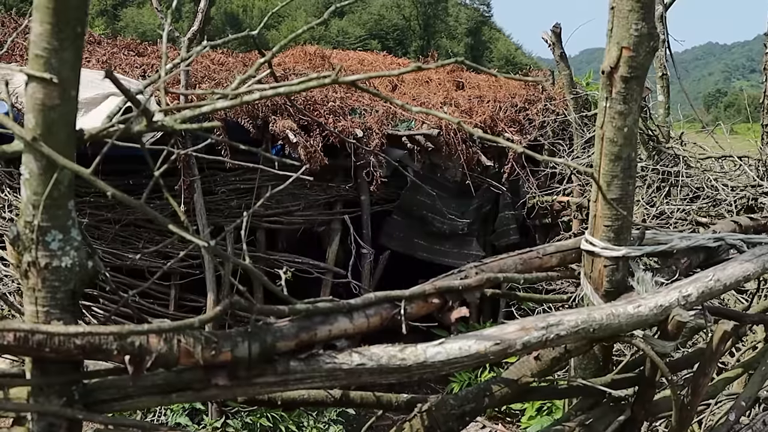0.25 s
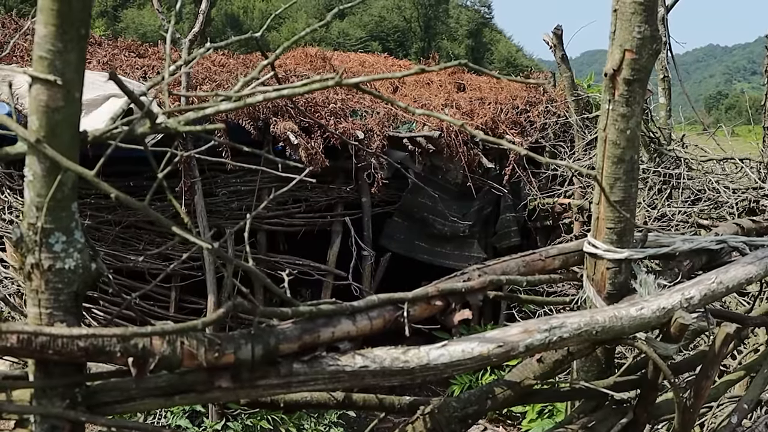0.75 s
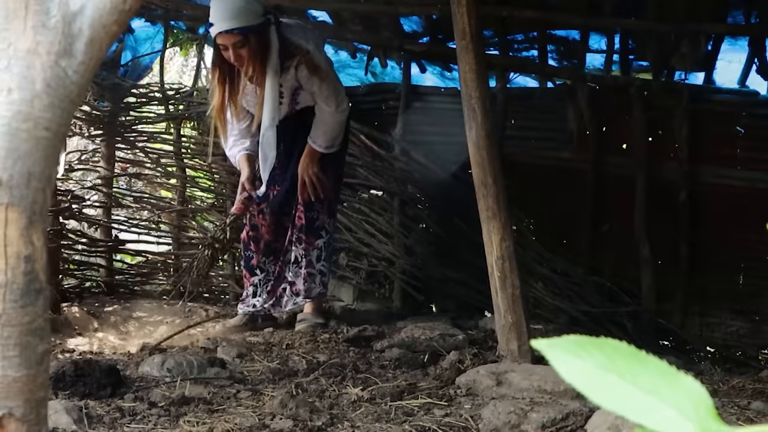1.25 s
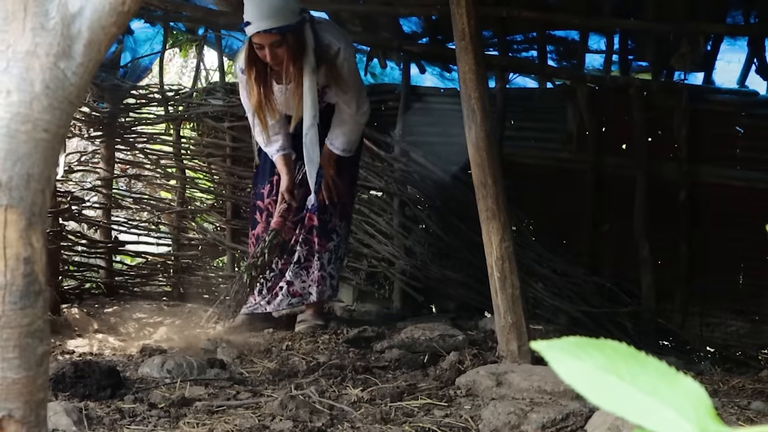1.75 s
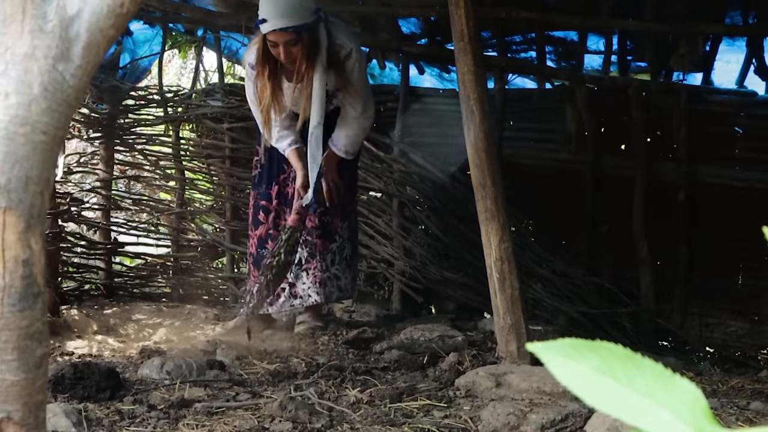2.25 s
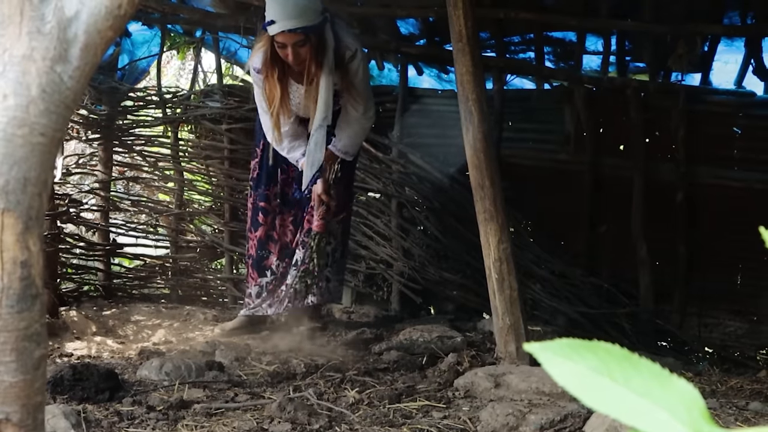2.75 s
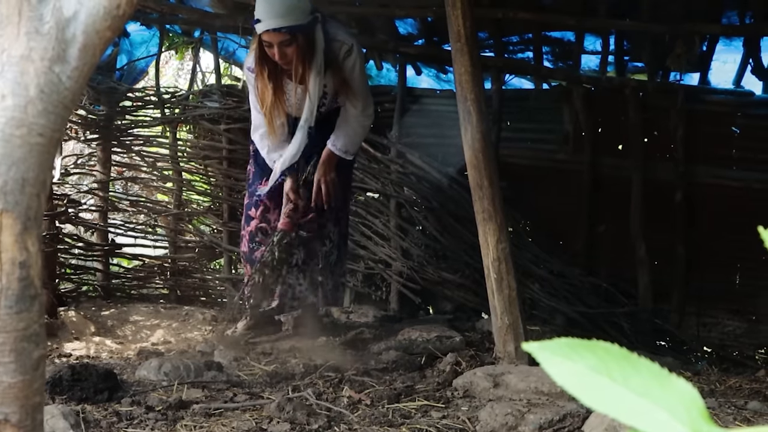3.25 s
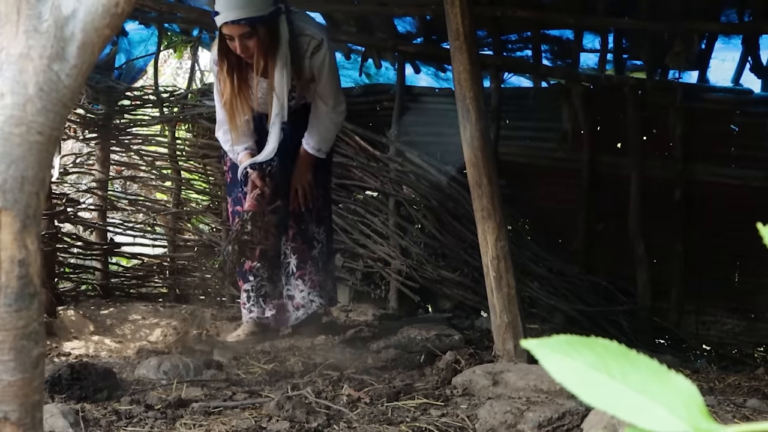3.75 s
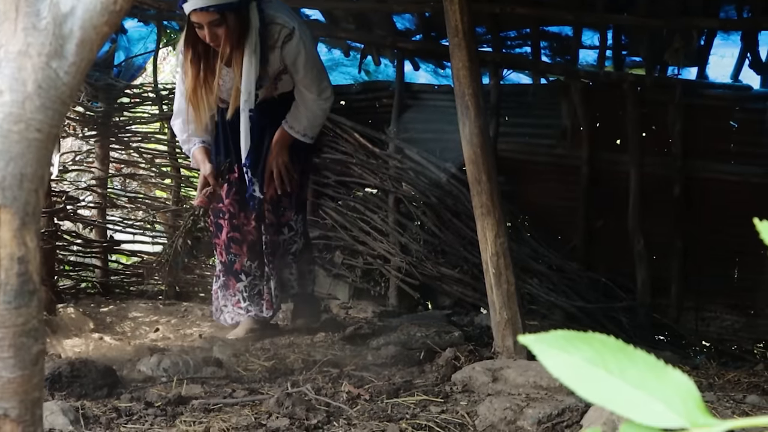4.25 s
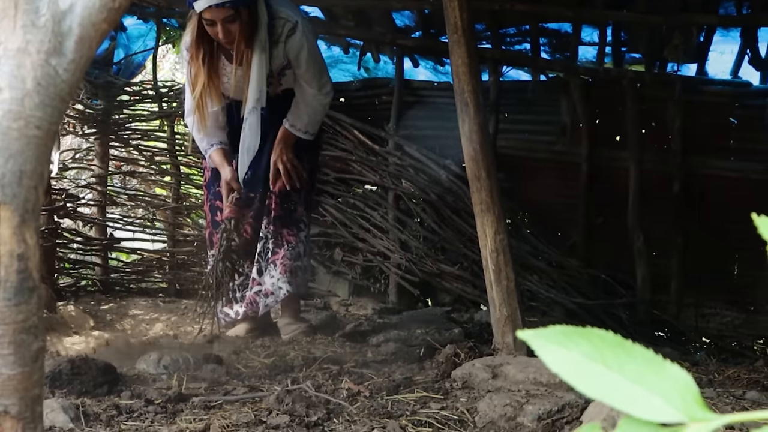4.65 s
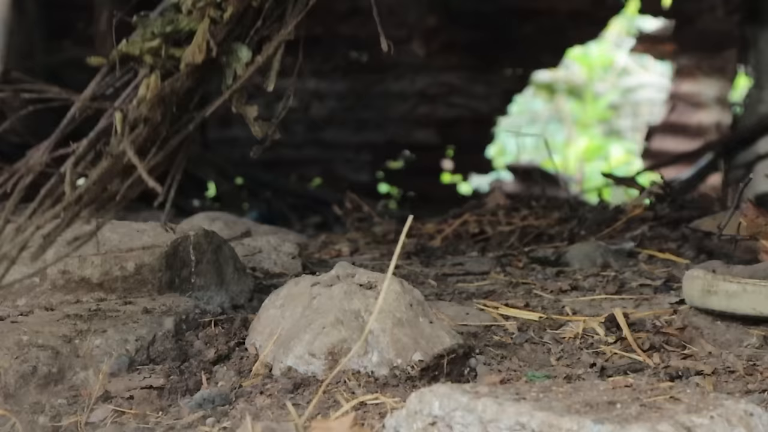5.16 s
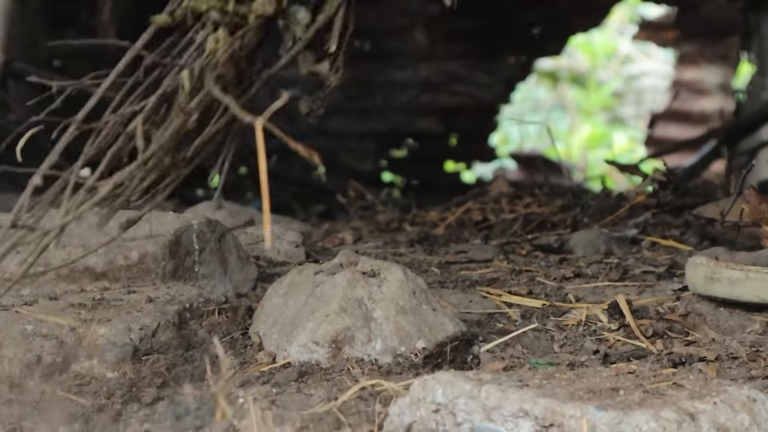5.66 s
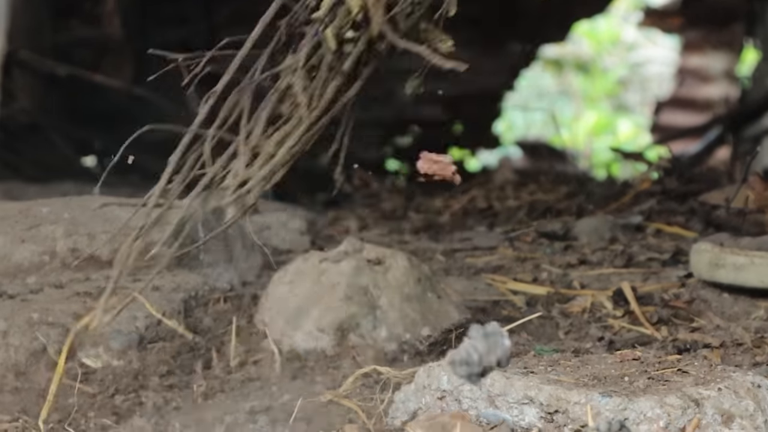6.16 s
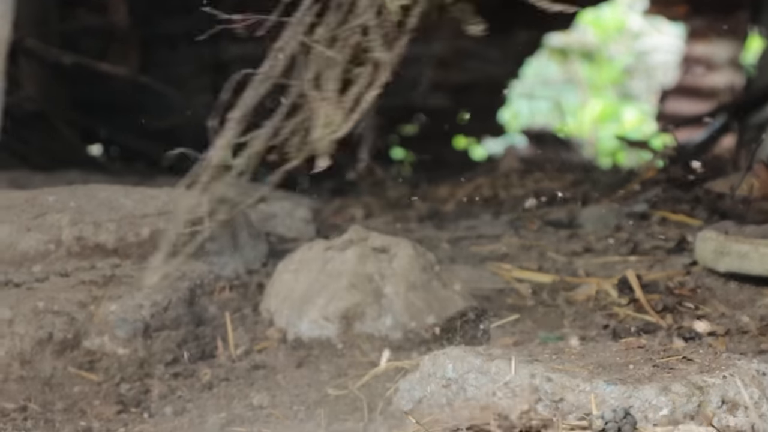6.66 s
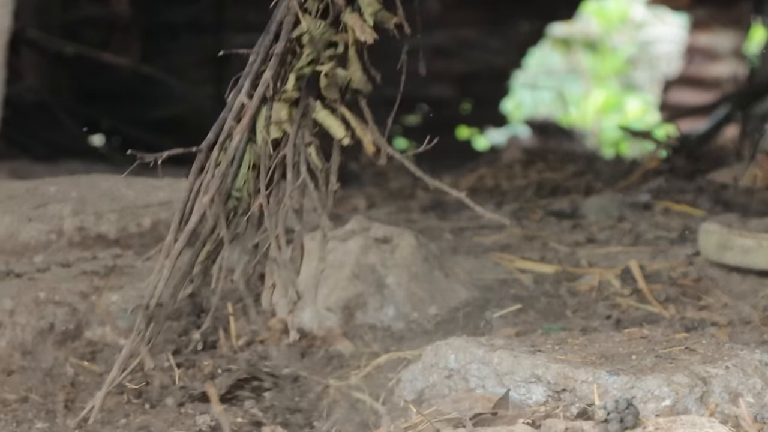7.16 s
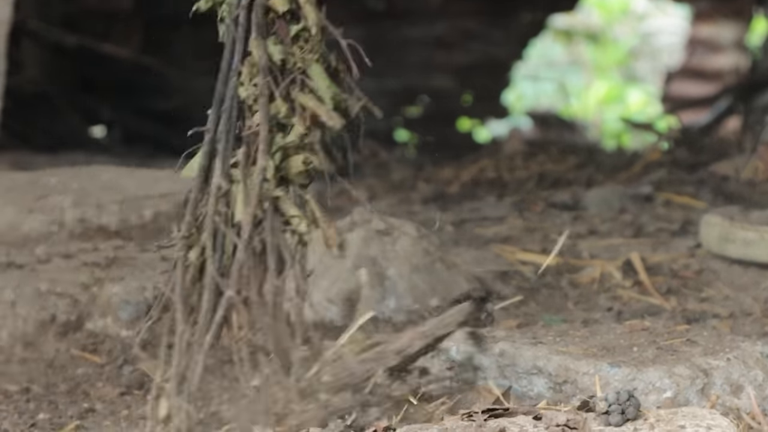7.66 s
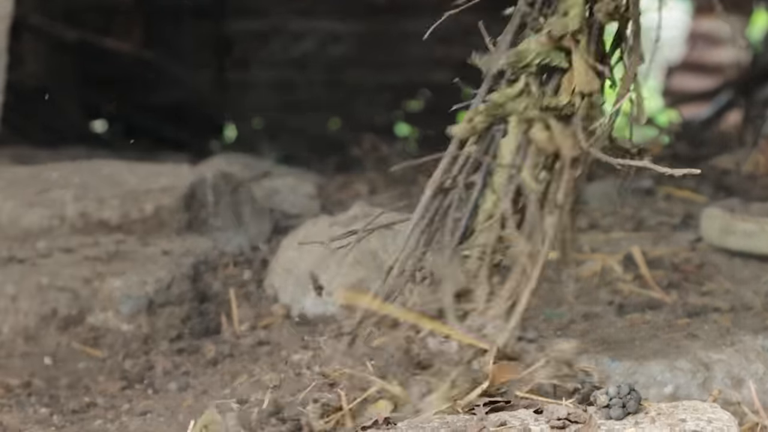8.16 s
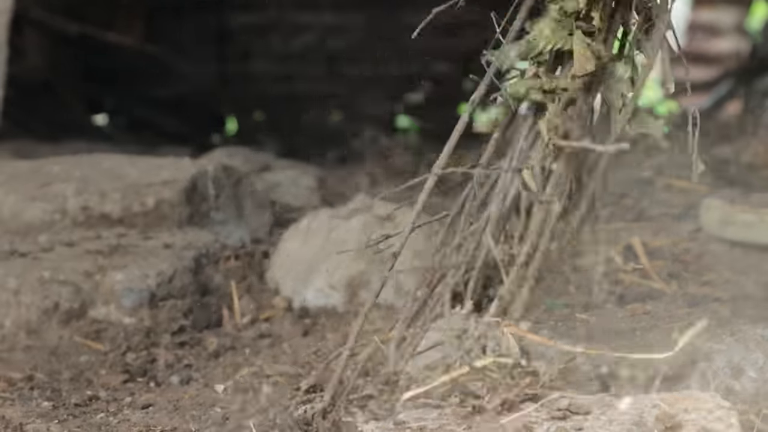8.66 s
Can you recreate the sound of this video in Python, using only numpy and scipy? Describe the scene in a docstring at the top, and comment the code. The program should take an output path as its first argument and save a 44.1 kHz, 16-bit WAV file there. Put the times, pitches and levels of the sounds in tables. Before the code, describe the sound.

Faint distant engine throb and a quick bird twitter, then a dry twig broom sweeps dirt in brisk, scratchy, hissing strokes with small snaps.

```python
"""Twig broom in an open hut

A bundle of dry twigs sweeps a dirt floor in quick strokes: noise shaped by random slips and hand pressure.
Twigs snap (noise bursts), clods thud (damped tones), and birds chirp and hoot outside (bent sine notes).
Far away a slow engine throbs (harmonics) in open air (noise); late on something rumbles low.
The camera turns down every quiet band above about 750 Hz."""
import sys
import numpy as np
from scipy import signal
from scipy.fft import rfft, irfft, next_fast_len
from scipy.io import wavfile
from scipy.ndimage import uniform_filter1d, map_coordinates

SR = 44100
rng = np.random.default_rng(int(sys.argv[2]) if len(sys.argv) > 2 else 0)


def int16_out(signal):
    """Quantize to a 16-bit WAV file."""
    q = np.round(np.clip(np.atleast_2d(signal).T, -1, 1) * 32767)
    wavfile.write(sys.argv[1], SR, q.astype(np.int16))


N = 393362  # length [samples]

# broom strokes: (touch time [s], rise [s], hold [s], lift [s], touch level under full pressure [dB],
# twig-tip hiss [dB], scratch on the dirt [dB], stem drag [dB])
BROOM_STROKES = [(0.96, 0.11, 0.16, 0.095, 18, -39, -43, -54),
                 (1.447, 0.18, 0.0083, 0.19, 11.5, -36.5, -43.5, -56.5),
                 (1.868, 0.18, 0.0077, 0.27, 22, -33.5, -40, -63),
                 (2.384, 0.15, 0.074, 0.053, 13, -34, -42, -54.5),
                 (2.796, 0.11, 0.083, 0.17, 9, -40, -50.5, -58),
                 (3.248, 0.16, 0.0077, 0.063, 16, -35, -50.5, -58),
                 (3.695, 0.048, 0.1, 0.041, 11.5, -36.5, -51, -58),
                 (4.108, 0.057, 0.086, 0.11, 20.5, -32.5, -45.5, -53),
                 (4.522, 0.14, 0.076, 0.11, 16.5, -32, -42.5, -50),
                 (5.003, 0.093, 0.013, 0.11, 20, -32, -43, -51.5),
                 (5.291, 0.12, 0.16, 0.069, 11, -36, -44, -56.5),
                 (5.847, 0.13, 0.063, 0.15, 17, -31.5, -37.5, -49.5),
                 (6.381, 0.12, 0.056, 0.14, 22.5, -31.5, -36.5, -53.5),
                 (7.007, 0.09, 0.036, 0.18, 20, -33, -36.5, -50.5),
                 (7.526, 0.19, 0.061, 0.14, 6.5, -41, -49, -49.5),
                 (8.003, 0.14, 0.2, 0.063, 26.5, -35, -39.5, -72),
                 (8.533, 0.13, 0.055, 0.13, 11, -35.5, -40.5, -53)]
# short scuffs of loose debris during and between strokes:
# (time [s], length [s], twig-tip hiss [dB], scratch [dB], grit [dB], stem drag [dB])
DEBRIS_SCUFFS = [(0.425, 0.061, -73.5, -57.5, -68, -56), (1.314, 0.081, -46.5, -58.5, -60, -60),
                 (1.498, 0.11, -68, -47.5, -66, -49), (1.719, 0.055, -55, -53, -76.5, -66),
                 (1.853, 0.048, -39.5, -48.5, -55.5, -59.5), (2.364, 0.015, -45, -46, -58, -57),
                 (2.651, 0.16, -48, -57, -53, -66), (2.732, 0.055, -54, -47, -57, -55),
                 (3.279, 0.18, -63, -58, -66.5, -55), (3.57, 0.15, -66.5, -58.5, -76, -51),
                 (3.866, 0.018, -29, -28.5, -32.5, -35.5), (3.94, 0.06, -46, -50, -63, -58),
                 (4.021, 0.044, -49.5, -49, -67, -58), (4.085, 0.067, -47.5, -46.5, -80, -57),
                 (4.802, 0.041, -73, -56, -77, -52), (4.956, 0.061, -45.5, -51, -63.5, -50),
                 (6.1, 0.21, -72.5, -60, -82, -49.5), (6.344, 0.079, -60, -55, -60, -64.5),
                 (6.662, 0.42, -54.5, -60.5, -56, -56), (6.959, 0.15, -45, -60.5, -51.5, -62),
                 (7.82, 0.11, -68, -62, -70, -58), (7.889, 0.15, -70, -56, -53, -48),
                 (8.396, 0.55, -57, -53.5, -51, -58)]
# leaves rustling between strokes: (time [s], level [dB])
LEAF_RUSTLE = [(.93, -56.5), (3.1, -52.5), (5.2, -54), (6.3, -58.5), (7.4, -67.5), (8.92, -51.5)]
# grit against the scratch, weaker at first and stronger later: (time [s], grit level [dB])
GRIT_OVER_TIME = [(1, -11), (2.5, -3), (5, 3.5), (5.9, 6.5), (8.9, 3)]
# colours of tip hiss, dirt scratch, grit and stem drag: (frequency [Hz], relative level [dB per Hz])
TIP_SPECTRUM = [(4000, -25), (6300, -13.5), (8000, 1.5), (10500, 4), (12000, 0), (13500, -16.5),
                (16000, -38.5)]
DIRT_SPECTRUM = [(900, -26), (1400, -8.5), (2200, 3.5), (3200, 2), (4200, -4), (6000, -46.5)]
GRIT_SPECTRUM = [(2500, -20), (3600, -3.5), (4800, 0.5), (6000, -8.5), (8000, -9.5), (12000, -57)]
STEM_SPECTRUM = [(120, -26.5), (300, -1.5), (800, -1), (1300, 1), (2000, -19)]
# twig snaps and ticks: (time [s], relative level [dB], part under 6 kHz against the whole [dB],
# left-right difference [dB])
TWIG_SNAPS = [(0.2556, -40, -16, -2), (0.3289, -47.5, -30, 13), (1.182, -35, -2, 2),
              (1.8591, -33.5, -12, 6), (2.5122, -28.5, 7, -14), (2.687, -37.5, -4.5, 6),
              (2.729, -34, -2, 3), (3.7187, -38, -37.5, -2.5), (3.8455, -16, -8, -11),
              (4.364, -37.5, -64, 1), (4.407, -46.5, -51, 21.5), (4.439, -41, -56, 6),
              (4.5696, -13, -19, -11), (5.0664, -20, -16, 4), (5.299, -32.5, -7, 10), (6.134, -42, 0, 1.5),
              (6.4376, -30, -25.5, -5.5), (7.0849, -25.5, -2.5, 8.5), (7.153, -28.5, -0.5, 1),
              (7.9145, -40, 0, 3.5), (8.056, -32.5, -9, 3), (8.4125, -25, 0, -4.5), (8.5776, -26, 9, 10),
              (8.657, -21.5, -5.5, -5)]
# colour of a breaking twig: (frequency [Hz], relative level [dB per Hz])
CRACK_SPECTRUM = [(4500, -33), (8000, -8.5), (11000, -4.5), (14000, -31.5)]
# clods and steps: (time [s], relative level [dB], pitch [Hz], 60 dB decay [s])
CLOD_THUDS = [(0.441, -38, 267, 0.028), (2.801, -37, 570, 0.062), (4.573, -30.5, 460, 0.018),
              (5.295, -32, 270, 0.057), (5.822, -27.5, 746, 0.043), (6.697, -37, 706, 0.069),
              (7.414, -38.5, 206, 0.33), (7.562, -37.5, 726, 0.095), (7.678, -32.5, 126.2, 0.3),
              (8.299, -34.5, 670, 0.063), (8.547, -28.5, 245, 0.028)]
# bird notes, then soft low hoots:
# (time [s], length [s], start pitch [Hz], middle pitch [Hz], end pitch [Hz], level [dB])
BIRD_NOTES = [(.231, 0.012, 3700, 4000, 4400, -58), (.247, 0.011, 3620, 4300, 4900, -53),
              (.263, 0.008, 4800, 4350, 3750, -49), (.275, 0.013, 4800, 4060, 3340, -49.5),
              (.292, 0.012, 3270, 4360, 3400, -44), (.309, 0.022, 3320, 3950, 4400, -45.5),
              (.331, 0.013, 4440, 3970, 3100, -47.5), (.356, 0.012, 3130, 3450, 3100, -51.5),
              (1.31, .092, 2850, 2500, 2420, -60), (1.732, 0.042, 3880, 3680, 3120, -48),
              (1.875, 0.064, 3520, 3430, 3520, -50), (1.938, 0.078, 3580, 3070, 3560, -49),
              (2.085, 0.069, 3950, 3490, 3150, -55.5), (3.222, 0.016, 4000, 3900, 3780, -58),
              (3.243, 0.04, 3580, 3420, 3200, -56)]
LOW_HOOTS = [(5.61, 0.067, 742, 715, 663, -49), (6.94, 0.065, 747, 713, 670, -47),
             (8.14, 0.38, 288.6, 293.7, 247, -54)]
# engine orders: (multiple of the firing rate, relative level [dB])
ENGINE_ORDERS = [(2, -4), (3, -4), (4, -3), (5, -10), (6, -13.5)]
# background over time: (time [s], waver of the engine's orders [dB], air gain [dB], low rumble level [dB])
BACKGROUND = [(.85, 5, 3.5, -70), (1, 1, 1.5, -70), (5.2, 1, 3, -68), (7.0, 2, 0.5, -62),
              (7.9, 1.5, 4.5, -58), (8.92, 2.5, 4.5, -57)]
# colour of the open air: (frequency [Hz], level before the gain over time [dB per Hz])
AIR_SPECTRUM = [(25, -110), (50, -93), (120, -87), (200, -83), (350, -90), (520, -84), (730, -92.5),
                (1000, -92), (2000, -105), (3200, -100), (4900, -99.5), (6300, -100), (9000, -106),
                (12000, -112), (16000, -125)]
# colour of the late rumble: (frequency [Hz], relative level [dB per Hz])
RUMBLE_SPECTRUM = [(70, -40.5), (110, -7.5), (200, -2.5), (300, -2.5), (400, -34)]
# stereo width of the noises: (frequency [Hz], left-right likeness [0-1])
STEREO_LIKENESS = [(60, 0.71), (240, 0.79), (950, 0.11), (3770, 0.024), (15000, 0.038)]
# unlike colour of the two microphone ports: (frequency [Hz], left-right difference [dB])
PORT_COLOUR = [(60, -2), (180, -1), (550, -7.5), (1650, -5), (4970, 1.5), (15000, 6.5)]
# where the noise suppressor opens: (frequency [Hz], level over the band's quiet level [dB])
OPENING_LEVELS = [(750, 17.5), (2000, 14), (5000, 13.5), (8000, 18.5), (12000, 17)]

TOUCH_S, SAG_DB, LIFT_DB = 0.0087, 3.5, 24.5  # landing time; loss by the end of the hold; loss per lift time
DIRT_STEEPER, STEMS_FLATTER = 1.294, 0.66  # how scratch and drag follow the pressure in dB
SCUFF_FADE_DB = 9  # lost over a scuff's length
FIRING_HZ, ENGINE_DB = 23.63, -52.5
TOP_HZ = 15830  # upper band limit


def broom():
    """Tips hiss, twigs scratch dirt and grit, stems drag; thick twigs' slips drive all but the tips."""
    tips_gain, dirt_gain, grit_gain, stems_gain = gestures()
    thin = slips(rate=230, spiky_db=4.0, life_s=0.0052)
    thick = slips(rate=330, spiky_db=0, life_s=0.0022)
    tips = tips_gain * scratchy(TIP_SPECTRUM, thin, patchy_db=0.5)
    dirt = dirt_gain * scratchy(DIRT_SPECTRUM, thick, patchy_db=4)
    grit = grit_gain * scratchy(GRIT_SPECTRUM, thick, patchy_db=4)
    softened = np.sqrt(thick)
    stems = stems_gain * scratchy(STEM_SPECTRUM, softened, patchy_db=2)
    return tips + dirt + grit + stems


def gestures():
    """Gain over time of tips, dirt, grit and stems: the powers of strokes, scuffs and rustle add up."""
    power, t = np.zeros((4, N)), np.arange(N) / SR
    follows = np.array([[1], [DIRT_STEEPER], [DIRT_STEEPER], [STEMS_FLATTER]])
    for s, rise, hold, lift, touch_db, tips_db, dirt_db, drag_db in BROOM_STROKES:
        grit_db = dirt_db + np.interp(s, *np.transpose(GRIT_OVER_TIME))
        end = s + rise + hold + 4 * lift
        span = slice(round((s - TOUCH_S) * SR), round(end * SR))
        top_db = np.c_[[tips_db, dirt_db, grit_db, drag_db]]
        push_db = pressure(s, rise, hold, lift, touch_db)[span]
        power[:, span] += amp(top_db + follows * push_db) ** 2
    for s, length, *levels_db in DEBRIS_SCUFFS:
        span = slice(round(s * SR), round((s + 4 * length) * SR))
        fade_db = SCUFF_FADE_DB * abs(t[span] - s) / length
        power[:, span] += amp(np.c_[levels_db] - fade_db) ** 2
    # the leaves rustle in the tips' band
    rustle_db, = curves(LEAF_RUSTLE)
    power[0] += amp(rustle_db) ** 2 * (t > LEAF_RUSTLE[0][0])
    return np.sqrt(power)


def pressure(s, rise, hold, lift, touch_db):
    """Pressure in dB against full: the twigs land, dig in, sag a little and lift off."""
    times = s + np.cumsum([-TOUCH_S, TOUCH_S, rise, hold, 4 * lift])
    levels_db = [-4 * LIFT_DB, -touch_db, 0, -SAG_DB, -SAG_DB - 4 * LIFT_DB]
    return np.interp(np.arange(N) / SR, times, levels_db)


def slips(rate, spiky_db, life_s):
    """A level that jumps at each slip of a twig, rate slips a second; each slip's power decays over life_s."""
    slipping = rng.random(N) < rate / SR
    jumps = slipping * amp(2 * spiky_db * np.minimum(rng.exponential(size=N), 3))
    power = signal.lfilter([1], [1, -np.exp(-1 / (life_s * SR))], jumps)
    return np.sqrt(power + 0.71 * power.mean())  # a steady bed under the slips


def scratchy(spectrum, level, patchy_db):
    """Noise of this spectrum with random uneven patches, its level set by the slips."""
    return unit(level * patchy(spread(spectrum), patchy_db))


def snaps():
    """Each snap is a sharp crack, a short splintering and a weaker, longer scatter of dirt, from one spot."""
    out, t = np.zeros((2, N + SR)), np.arange(SR // 4) / SR
    crack = 0.51 * amp(-60 * t / 0.0044)
    splintering = 0.65 * amp(-60 * t / 0.07)
    scatter = 0.041 * amp(-60 * t / 0.16)
    for s, db, low_db, pan_db in TWIG_SNAPS:
        high = unit(spread(CRACK_SPECTRUM, size=len(t)))
        mid = unit(spread(GRIT_SPECTRUM, size=len(t)))
        low = unit(spread(DIRT_SPECTRUM, size=len(t)))
        share = min(amp(low_db), 1)
        bright = np.sqrt(1 - share ** 2)
        burst = bright * high + share * unit(low + 0.83 * mid)
        burst = unit(burst + 1.2 * burst[::-1])  # blend the channels towards one spot
        gain = amp(db - 4 + np.array([[pan_db / 2], [-pan_db / 2]]))
        start = round(s * SR)
        out[:, start:start + len(t)] += gain * (crack + splintering + scatter) * burst
    return out[:, :N]


def thuds():
    """A lump of earth answers with one damped, unsteady tone and a dull puff around it."""
    out, t = np.zeros(N + SR), np.arange(SR // 2) / SR
    onset = 1 - np.exp(-t / 0.00071)
    for s, db, hz, t60 in CLOD_THUDS:
        dull = lambda f: f / (hz + f) / (1 + (f / (1.22 * hz)) ** 4)
        puff = unit(filtered(rng.standard_normal(len(t)), dull)) * amp(-60 * t / 0.13)
        drift = np.cumsum(rng.standard_normal(len(t))) * np.sqrt(0.15 * hz / SR)  # phase [radians]
        tone = np.sin(2 * np.pi * hz * t + drift) * amp(-60 * t / t60)
        start = round(s * SR)
        out[start:start + len(t)] += amp(db - 2.0) * onset * (tone + 0.49 * puff)
    return out[:N]


def whistles(notes):
    """Sine notes whose pitch bends along a parabola through three points; distance makes them flutter."""
    out = np.zeros(N)
    for s, length, *pitch_hz, db in notes:
        u = np.arange(round(length * SR)) / (length * SR)  # 0 to 1 through the note
        hz = np.polyval(np.polyfit([0, .5, 1], pitch_hz, 2), u)
        swell = np.sqrt(2 * np.sin(np.pi * u))
        start = round(s * SR)
        out[start:start + len(u)] += amp(db) * swell * np.sin(2 * np.pi * np.cumsum(hz) / SR)
    return out * amp(2 * wobble(90))


def echoed(x, t60, wet_db, own):
    """Dry sound plus its scatter from trees and twig walls, a decaying noise; own = part unlike left to right."""
    t = np.arange(SR // 2) / SR
    shared, *sides = rng.standard_normal((3, len(t))) * amp(-60 * t / t60)
    tail = shared * np.sqrt(abs(1 - own ** 2)) + own * np.array(sides)
    tail = tail / np.linalg.norm(tail[0])
    return x + amp(wet_db) * signal.fftconvolve(x[None], tail, axes=1)[:, :N]


def engine():
    """The low orders line up into one throb per firing, the higher ones a little late; each wavers."""
    waver_db = curves(BACKGROUND)[0]
    turn = 2 * np.pi * np.cumsum(FIRING_HZ * (1 + 0.0043 * wobble(1.0))) / SR
    offset = 0.11 * np.array([[1], [-1]])  # radians: a small phase offset between channels widens the throb
    throb = np.zeros((2, N))
    for k, db in ENGINE_ORDERS:
        level = amp(db + waver_db * (wobble(9.8) - 0.5))
        phase_waver = 0.17 * waver_db * wobble(14)
        throb += level * np.cos(k * turn + offset - 0.27 * k * k + phase_waver)
    return -np.sqrt(2) * amp(ENGINE_DB) * throb


def open_air():
    """Open air murmurs: broad noise with a gently wandering level."""
    air_db = curves(BACKGROUND)[1]
    return np.sqrt(SR / 2) * amp(air_db + 1.5 * wobble(7.7)) * spread(AIR_SPECTRUM)


def low_rumble():
    """Low, patchy noise in the centre, its level unsteady and swelling late on."""
    rumble_db = curves(BACKGROUND)[2]
    noise = patchy(spread(RUMBLE_SPECTRUM), depth_db=2).mean(axis=0)
    return amp(rumble_db + 3 * wobble(9.8)) * unit(noise)


def patchy(x, depth_db):
    """Random gain in patches of about 350 Hz by 30 ms, shared by both channels."""
    z = signal.stft(x, nperseg=256)[2]
    field = uniform_filter1d(rng.standard_normal(z.shape[1:]), size=2, axis=0)
    field = uniform_filter1d(field, size=10, axis=1)
    return signal.istft(z * amp(depth_db * unit(field)), nperseg=256)[1][:, :N]


def spread(spectrum, size=N):
    """Stereo noise with this spectrum, alike in the bass and nearly unrelated in the treble."""
    def response(hz):
        turn = np.arccos(np.clip(along(STEREO_LIKENESS, hz), -1, 1)) / 2
        return amp(along(spectrum, hz)) * [np.cos(turn), np.sin(turn)]
    mid, side = filtered(rng.standard_normal((2, size)), response)
    return np.array([mid + side, mid - side])


def filtered(x, response):
    """x times a response of frequency."""
    m = next_fast_len(x.shape[-1] + 4096)
    return irfft(rfft(x, m) * response(np.fft.rfftfreq(m, 1 / SR)), m)[..., :x.shape[-1]]


def wobble(rate):
    """A random curve of straight lines between knots, rate knots a second."""
    knots = rng.standard_normal(int(N * rate / SR) + 4)
    return map_coordinates(knots, [np.arange(N) * rate / SR], order=1)


def curves(rows):
    """One value per sample for each column after the time."""
    s, *cols = np.transpose(rows)
    return [np.interp(np.arange(N) / SR, s, c) for c in cols]


def along(points, hz):
    """Reads (frequency [Hz], value) points on a log frequency axis."""
    f, v = np.transpose(points)
    return np.interp(np.log(hz + 1), np.log(f + 1), v)


def amp(db):
    """Decibels to amplitude."""
    return 10 ** (np.asarray(db) / 20)


def unit(x):
    """x scaled to an RMS of 1."""
    return x / np.sqrt(np.mean(x ** 2) + 1e-20)


def scene():
    """Sweeping up front, birds to the right, hoots and thuds with a short echo, the distance behind."""
    birds = echoed(whistles(BIRD_NOTES), t60=0.33, wet_db=-3, own=.9) * amp([[-1.5], [1.5]])
    low = echoed(whistles(LOW_HOOTS) + thuds(), t60=0.1, wet_db=-3.5, own=.6)
    return broom() + snaps() + birds + low + engine() + open_air() + low_rumble()


def suppressed(x, slope, depth_db, release_db_s):
    """Each third-octave band is turned down as it nears its own quiet level: fast up, slower down."""
    hz, t, z = signal.stft(x, SR, nperseg=1024, noverlap=768)
    edges = np.append(755 * 2 ** (np.arange(13) / 3), SR / 2)  # the last band runs to the top
    for lo, hi in zip(edges, edges[1:]):
        band = (hz >= lo) & (hz < hi)
        power = np.sum(np.abs(z[:, band]) ** 2, (0, 1))
        level_db = 10 * np.log10(uniform_filter1d(power, size=4) + 1e-20)
        quiet_db = np.percentile(level_db, 6)
        over_db = level_db - quiet_db - along(OPENING_LEVELS, lo)
        gain_db = np.clip(slope * over_db, -depth_db, 0)
        # the gain rises at once but falls no faster than the release
        held_db = np.maximum.accumulate(gain_db + release_db_s * t) - release_db_s * t
        z[:, band] *= amp(held_db)
    return signal.istft(z, SR, nperseg=1024, noverlap=768)[1][:, :N]


def record(dry):
    """Two ports of unlike colour, the noise suppressor, then the band limit."""
    ports = filtered(dry, lambda hz: amp(np.outer([.5, -.5], along(PORT_COLOUR, hz))))
    quieted = suppressed(ports, slope=2.29, depth_db=29.0, release_db_s=324.5)
    return filtered(quieted, lambda hz: hz < TOP_HZ)


dry = scene()
out = record(dry)
int16_out(out)
```